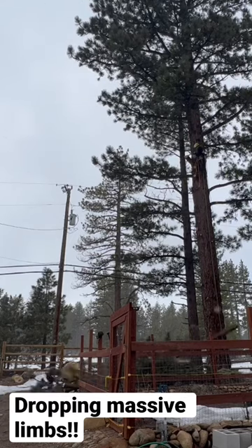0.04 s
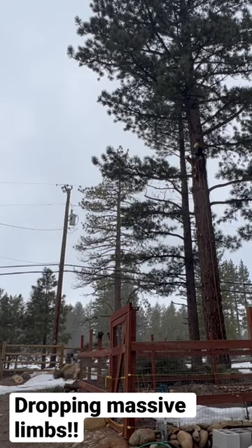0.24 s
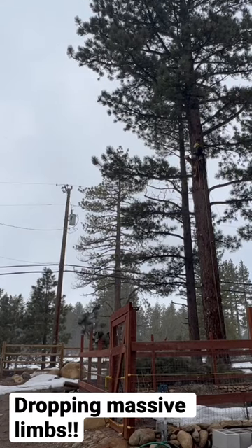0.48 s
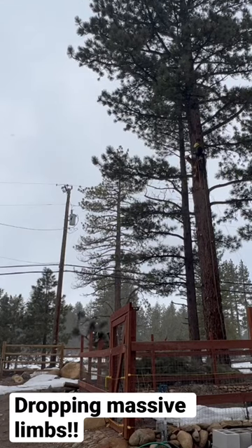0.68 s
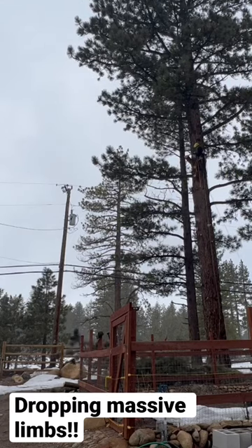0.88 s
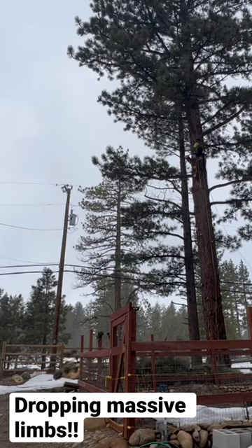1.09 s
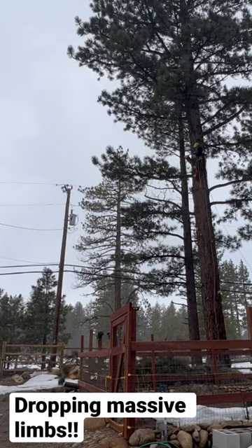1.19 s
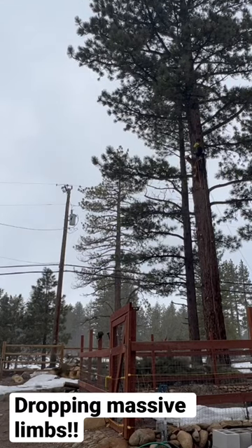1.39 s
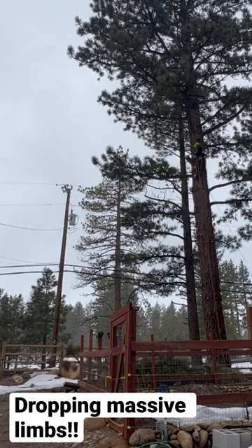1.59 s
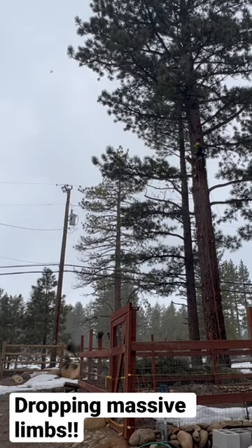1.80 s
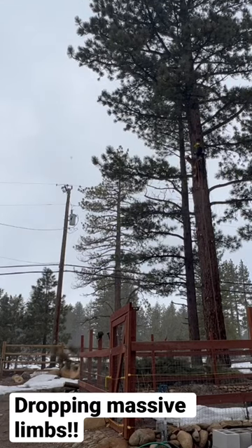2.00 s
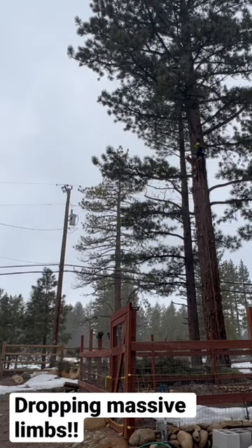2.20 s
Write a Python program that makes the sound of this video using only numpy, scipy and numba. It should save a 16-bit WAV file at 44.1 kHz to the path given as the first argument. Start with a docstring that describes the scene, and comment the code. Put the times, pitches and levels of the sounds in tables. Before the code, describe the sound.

A cut tree limb cracks and thuds onto the ground, a small engine puttering some way off.

```python
"""A yard, where a cut pine limb lands a little left of the microphone. A branch snaps, the heavy wood
thuds into the earth and rebounds, twigs crackle and needles rustle as it settles. Some way off a
small engine putters, each firing ringing its exhaust and casing, and slows near the end. Behind it
all lie low air and a soft outdoor hiss; trees and fences return a short echo."""
import sys
import numpy as np
from scipy import signal
from scipy.fft import rfft, irfft
from scipy.io import wavfile
from scipy.ndimage import map_coordinates
from numba import njit

SR = 44100
rng = np.random.default_rng(int(sys.argv[2]) if len(sys.argv) > 2 else 0)


def generate_wav(sig):
    """Save sig (samples, or channels by samples) to the path in sys.argv[1] as 16-bit PCM at SR."""
    pcm = np.round(np.clip(np.atleast_2d(sig).T, -1, 1) * 32767).astype(np.int16)
    wavfile.write(sys.argv[1], SR, pcm)


N = 99225
TIME = np.arange(N) / SR


def cracks():
    """Each snap rings the limb's modes around its own pitch and tears a burst of fibres."""
    # Each row: start in seconds, level in dB, brightest pitch in Hz,
    # splinters in dB against the knock, their decay in seconds.
    snaps = [(0.004, -26.5, 1920, -14, 0.0044), (0.057, -40, 2800, 4, 0.0017),
             (0.0665, -24, 1800, -7, 0.0012), (0.176, -35, 4550, 5, 0.0019), (0.187, -49, 4500, 6, 0.0017),
             (0.2062, -13.5, 1870, -25, 0.0012), (0.2075, -17, 4180, -4, 0.0012),
             (0.2155, -15, 690, -27, 0.0033), (0.218, -37.5, 5040, 9.5, 0.0039),
             (0.243, -37, 2100, -13, 0.0035), (0.2835, -20, 750, -4, 0.0083),
             (0.3452, -26, 850, -2.5, 0.011), (0.3464, -30.5, 4740, -1, 0.001),
             (0.3475, -21, 3100, -15, 0.001), (0.414, -33.5, 2090, -0.5, 0.0015),
             (0.6253, -35, 1180, -11.5, 0.0026), (1.1466, -25.5, 1000, -7.5, 0.0092),
             (1.1475, -26.5, 2170, -24, .002), (1.244, -38.5, 1570, -2.5, 0.0051)]
    # The limb's modes. Each row: frequency in Hz, relative level in dB, seconds to fade 60 dB.
    modes = [(223, -7, 0.052), (693, 4.5, 0.014), (841, 5.5, 0.023), (1424, 1, 0.019), (1805, 11, 0.013),
             (2090, 7.5, 0.014), (2400, 4.5, 0.016), (3013, 2.5, 0.017), (3740, 20, 0.0039),
             (4880, 5, 0.0085)]
    # Tearing fibres. Each row: frequency in Hz, relative level in dB.
    splinter_spectrum = [(200, -30), (700, -4.5), (1900, -6.5), (3700, -8.5), (5500, -5), (8500, -8.5),
                         (11000, -16.5), (16000, -65)]
    spread_octaves, stagger_s, knock_attack_s, tear_attack_s = 0.7, 0.00038, 0.00125, 0.00046
    sound = np.zeros(N)
    knock_time = TIME[:SR // 10]
    tear = unit(colour(rng.standard_normal(N), splinter_spectrum))
    for start, db, pitch_hz, splinter_db, decay_s in snaps:
        knock = 0
        for (hz, mode_db, t60), late in zip(modes, stagger_s * rng.random(len(modes))):
            age = np.maximum(knock_time - late, 0)
            weight = amp(mode_db) * np.exp(-.5 * (np.log2(hz / pitch_hz) / spread_octaves) ** 2)
            ring = np.sin(2 * np.pi * hz * age) * amp(-60 * age / t60)
            knock += weight * ring * np.minimum(age / knock_attack_s, 1)
        t = since(start)
        knock = np.interp(t, knock_time, knock / np.abs(knock).max(), right=0)
        fibres = unit(signal.sosfilt(butter(2, 2.24 * pitch_hz), tear))
        burst = np.minimum(t / tear_attack_s, 1) * np.exp(-np.maximum(t - tear_attack_s, 0) / decay_s)
        sound += amp(db) * (knock + amp(splinter_db) * burst * fibres)
    return ports(sound, left_db=2.5) + amp(-4) * yard_echo(sound)


def thuds():
    """The earth gives under each blow with a few low swings that sag in pitch, and a spray of soil."""
    # Each row: start in seconds, level in dB, settled pitch in Hz, seconds to fade 60 dB.
    blows = [(0.019, -34.5, 53.4, 0.1), (0.2742, -22.5, 185, 0.032), (0.2748, -21.5, 380, 0.027),
             (0.2875, -7, 66.4, 0.045), (0.3037, -33.5, 58.4, 0.34), (0.389, -25, 64.6, 0.081),
             (0.557, -28, 55.5, 0.087), (0.632, -33, 51, 0.086), (0.735, -28.5, 55, 0.046),
             (1.148, -29.5, 314, 0.015), (1.309, -39, 60, 0.13), (1.429, -37.5, 56, 0.17),
             (1.93, -30, 61.3, 0.12), (1.975, -26.5, 74, 0.056), (1.988, -30.5, 140, 0.066),
             (2.151, -38.5, 58.36, 0.17)]
    # Flying soil. Each row: frequency in Hz, relative level in dB.
    soil_spectrum = [(30, -77), (70, -1), (170, 7.5), (270, -22), (400, 1.5), (800, -30), (2000, -27),
                     (6000, -43)]
    attack_s, sag_share, sag_s, soil_decay_s = 0.0027, 0.3, 0.0079, 0.062
    body, spray = np.zeros(N), np.zeros(N)
    for start, db, hz, t60 in blows:
        t = since(start)
        phase = 2 * np.pi * hz * (t + sag_share * sag_s * (1 - np.exp(-t / sag_s)))
        swing = np.sin(phase) + amp(-10.5) * np.sin(2.145 * phase)
        push = amp(db) * (1 - np.exp(-t / attack_s))
        body -= 2 * push * amp(-60 * t / t60) * swing
        spray += push * np.exp(-t / soil_decay_s)
    sound = body + amp(-23.5) * spray * unit(colour(rng.standard_normal(N), soil_spectrum))
    return ports(sound, left_db=2.5) + amp(-8.5) * yard_echo(sound)


def boughs():
    """Countless small twigs tick over the rustle of needles."""
    # Twigs and needles together. Each row: frequency in Hz, relative level in dB.
    spectrum = [(150, 6.5), (400, 2), (850, 5), (1200, 0), (2000, 1.5), (3000, -3.5), (6500, -7),
                (9000, -34), (12000, -11.5), (16000, -21.5)]
    # The rustle dying away. Each row: time in seconds, level in dB.
    levels = [(0, -41.5), (.12, -40), (.19, -38.5), (.225, -34.5), (.26, -38.5), (.30, -39.5), (.36, -38),
              (.45, -40), (.6, -57.5), (.9, -63), (1.4, -73), (2.25, -76)]
    twigs_per_s, scatter_db = 1400, 3
    ticks = (rng.random(N) < twigs_per_s / SR) * rng.choice([-1, 1], N)
    twigs = ticks * amp(scatter_db * np.minimum(rng.exponential(size=N), 4))
    needles = amp(3.5) * unit(diffuse())
    rustle = unit(colour(ports(unit(twigs)) + needles, spectrum))
    return rustle * amp(curve(levels)) * pan(left_db=2.5)


def swish():
    """A soft, uneven swish, as of settling boughs, sinks in pitch."""
    # Each row: time in seconds, centre in Hz, level in dB.
    glide = [(1.3, 5330, -75), (1.48, 5095, -50.5), (1.6, 4536, -51), (1.74, 3730, -51), (1.89, 3541, -49),
             (1.98, 3406, -68)]
    noise = band(diffuse(), curve(glide), width_hz=1500)
    return noise * amp(curve(glide, column=2) + 2 * drift(per_s=25.2)) * pan(left_db=1)


def firings(turns):
    """One pulse per shaft turn, a little uneven in time and strength, every other one weaker."""
    jitter_s, scatter_db, weak_turn_db = 0.00006, 0.6, -4
    beats = np.arange(1, int(turns[-1]) + 1)
    late, scatter = rng.standard_normal((256, 2))[beats].T
    at = np.clip(np.interp(beats, turns, np.arange(N)) + jitter_s * SR * late, 0, N - 2)
    size = amp(scatter_db * scatter + weak_turn_db * (beats % 2))
    sample, fraction = at.astype(int), at % 1
    pulses = np.bincount(sample, size * (1 - fraction), N) + np.bincount(sample + 1, size * fraction, N)
    return pulses - pulses.mean()


def engine():
    """Some way off, firings ring the exhaust; the drone swells and sinks as the engine slows."""
    # Each row: time in seconds, firings per second, exhaust level in dB.
    running = [(0, 58.4, -43.5), (.43, 62.9, -46), (.65, 61, -42), (.78, 62, -44), (.84, 62.4, -44.5),
               (1.25, 64.9, -44.5), (1.46, 61.5, -45), (1.68, 63.6, -45.5), (1.87, 61.6, -44),
               (2.05, 60.6, -51), (2.25, 55.4, -50.5)]
    # The exhaust's tone. Each row: frequency in Hz, relative level in dB.
    exhaust_spectrum = [(35, -50), (65, -5), (110, -12.5), (165, 4.5), (215, 6.5), (255, 2), (310, -24),
                        (390, 3), (560, -5.5), (680, 0.5), (840, 0.5), (1050, -10.5), (1500, -19),
                        (3000, -12), (9000, -47)]
    # The clear hum. Each row: multiple of the firing rate, level in dB against the exhaust puffs.
    partials = [(1, -11), (3, -8), (3.5, -8.5), (4, -7), (6, -12.5), (8, -9.5), (9, -9.5), (11, -12)]
    # Two resonances. Each row: time in seconds, the lower's centre in Hz, its level in dB,
    # the upper's level in dB.
    resonances = [(0, 530, -56, -72), (.6, 530, -54, -72), (1.45, 545, -52, -70), (1.72, 530, -48.5, -66),
                  (1.84, 500, -42.5, -59), (2.0, 472, -41, -52.5), (2.1, 452, -39.5, -51),
                  (2.25, 428, -40, -51.5)]
    turns = np.cumsum(curve(running)) / SR
    pulses = firings(turns)
    direct, echo = ports(pulses, left_lag_s=0.00025), yard_echo(pulses)
    hum = 0
    for multiple, db in partials:
        wavering = amp(db + 3 * drift(per_s=14))
        hum += wavering * np.sqrt(2) * np.sin(2 * np.pi * (multiple * turns + rng.random()))
    puffs = unit(colour(direct + amp(-3) * echo, exhaust_spectrum))
    exhaust = amp(curve(running, column=2)) * (puffs + hum)
    drive = direct + amp(-14) * echo
    lower = amp(curve(resonances, column=2)) * band(drive, curve(resonances), width_hz=150)
    upper = amp(curve(resonances, column=3)) * band(drive, 945, width_hz=150)
    return (exhaust + lower + upper + casing_clatter(turns)) * pan(left_db=0.5)


def casing_clatter(turns):
    """Each firing shakes the engine casing into a brief ringing rattle."""
    # Each row: frequency in Hz, relative level in dB.
    modes = [(1750, -1), (1912, 3), (2089, -0.5)]
    decay_turns, scatter_db = 0.25, 2.5
    shake = diffuse() * np.exp(-(turns % 1) / decay_turns) * amp(scatter_db * drift(per_s=39.86))
    return amp(-50) * unit(sum(amp(db) * band(shake, hz, width_hz=150) for hz, db in modes))


def open_air():
    """Low outdoor air whose bass swells unevenly."""
    # Each row: frequency in Hz, relative level in dB.
    spectrum = [(20, -10), (35, -4.5), (56, 0), (100, 1.5), (200, 1.5), (320, -5.5), (600, -6),
                (750, -12.5), (1100, -16.5), (1900, -13), (2600, -21), (4000, -16), (8000, -42.5),
                (16000, -48)]
    air = unit(colour(diffuse(), spectrum))
    bass = signal.sosfiltfilt(butter(2, 120), air)
    swell = amp(-drift(per_s=10.06))
    return amp(-41) * (air - bass + bass * swell) * pan(left_db=4.5)


def high_hiss():
    """A high hiss, mostly from the left, flickers slightly."""
    # Each row: frequency in Hz, relative level in dB.
    spectrum = [(1500, -21), (2800, -12.5), (3600, -17.5), (4500, 9), (5600, 4), (6600, 10.5), (7800, 0),
                (8600, 4.5), (9400, -3.5), (10100, -26), (12000, -17), (16000, -68)]
    # Each row: time in seconds, level in dB.
    levels = [(0, -46.5), (1.2, -48.5), (1.55, -47.5), (1.75, -47.5), (2.25, -47)]
    hiss = unit(colour(diffuse(), spectrum))
    return hiss * amp(curve(levels) + 1.6 * drift(per_s=90)) * pan(left_db=7.5)


def yard_echo(x):
    """Scattered echoes from trunks, fences and the ground."""
    t60_s, onset_s = 0.46, 0.00096
    tail = diffuse() * amp(-60 * TIME / t60_s) * (1 - np.exp(-TIME / onset_s))
    return signal.fftconvolve(x[None], unit(tail) / np.sqrt(N), axes=-1)[:, :N]


def diffuse():
    """Noise from all round: alike at both microphone ports in the bass, unrelated in the treble."""
    mid, side = rng.standard_normal((2, N))
    side = signal.sosfilt(butter(1, 155, "high"), side)
    return np.array([mid + side, mid - side])


def ports(x, left_db=0, left_lag_s=0):
    """A point source at the microphone's two ports."""
    return np.array([np.interp(TIME - left_lag_s, TIME, x), x]) * pan(left_db)


def pan(left_db):
    """Channel gains, the left louder than the right by left_db."""
    return amp(np.array([[left_db], [-left_db]]) / 2)


def amp(db):
    """Decibels to gain."""
    return 10 ** (np.asarray(db) / 20)


def unit(x):
    """Scale to rms 1."""
    return x / np.sqrt(np.mean(x ** 2))


def since(start):
    """Seconds since an event, zero before it."""
    return np.maximum(TIME - start, 0)


def curve(table, column=1):
    """One column of a time table, sample by sample."""
    table = np.array(table)
    return np.interp(TIME, table[:, 0], table[:, column])


def drift(per_s):
    """Smooth random drift with spread near 1."""
    return map_coordinates(rng.standard_normal(256), [TIME * per_s], mode="mirror")


def butter(order, hz, kind="low"):
    """Sections of a low- or high-pass filter."""
    return signal.butter(order, hz, kind, fs=SR, output="sos")


def colour(x, spectrum):
    """Causal filter shaped by rows of frequency in Hz and gain in dB."""
    size = 8192
    hz, db = np.array(spectrum).T
    bin_hz = np.arange(size // 2 + 1) * SR / size
    gain = amp(np.interp(np.log(bin_hz + 1), np.log(hz), db))
    cepstrum = irfft(np.log(gain))
    cepstrum[1:size // 2] *= 2  # folding onto positive time gives minimum phase
    cepstrum[size // 2 + 1:] = 0
    response = irfft(np.exp(rfft(cepstrum)))
    return signal.fftconvolve(x, np.array(response, ndmin=x.ndim), axes=-1)[..., :N]


def band(x, hz, width_hz):
    """A steep resonance, steady or gliding, on both channels at rms 1."""
    centre, width = np.full(N, hz, dtype=float), float(width_hz)
    return unit(np.array([resonate(resonate(side, centre, width), centre, width) for side in x]))


@njit
def resonate(x, hz, width_hz):
    """Band-pass whose centre can move every sample."""
    y, band_state, low_state = np.empty(len(x)), 0., 0.
    for i in range(len(x)):
        tuning, damping = np.tan(np.pi * hz[i] / SR), width_hz / hz[i]
        passed = (band_state + tuning * (x[i] + 1e-18 - low_state)) / (1 + tuning * (tuning + damping))
        band_state = 2 * passed - band_state
        low_state += 2 * tuning * passed
        y[i] = damping * passed
    return y


def scene():
    """The limb, the engine and the open air."""
    return cracks() + thuds() + boughs() + swish() + engine() + open_air() + high_hiss()


def record(dry):
    """The microphone loses the deepest bass and cuts the top."""
    thin = signal.sosfilt(butter(3, 36, "high"), dry)
    return signal.sosfilt(signal.ellip(8, .2, 80, 16000, fs=SR, output="sos"), thin)


dry = scene()
out = record(dry)
generate_wav(out)
```